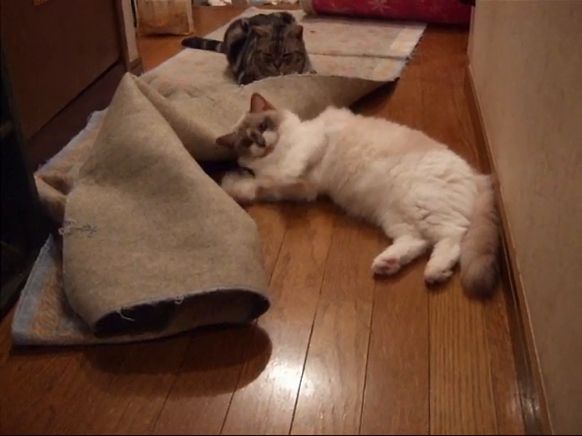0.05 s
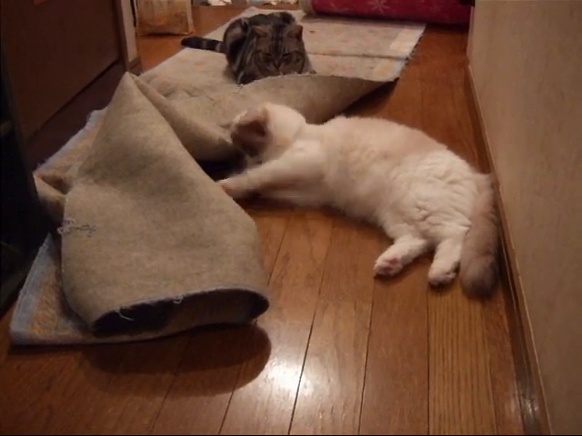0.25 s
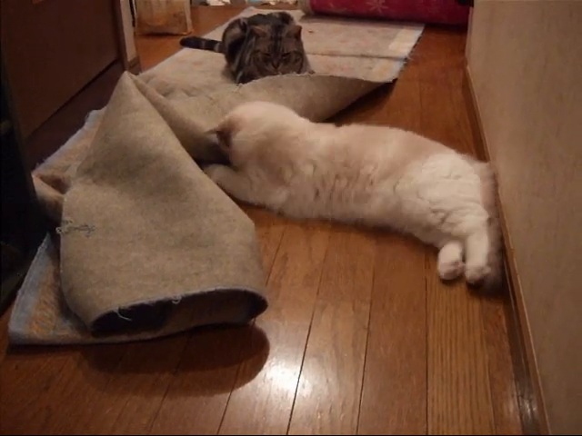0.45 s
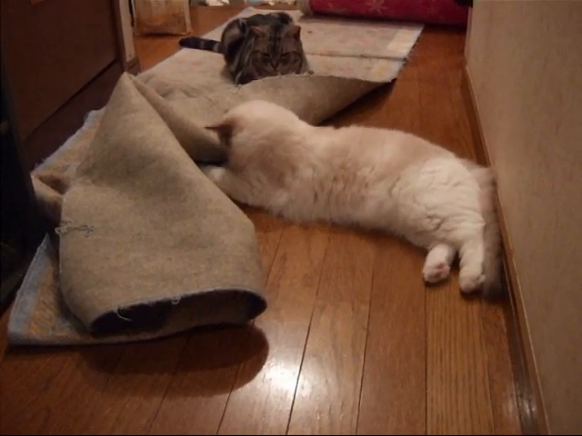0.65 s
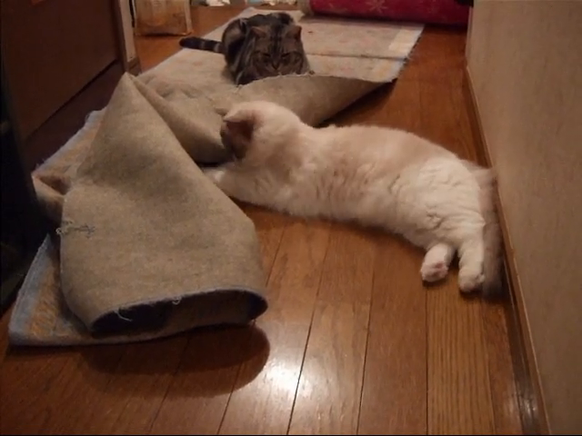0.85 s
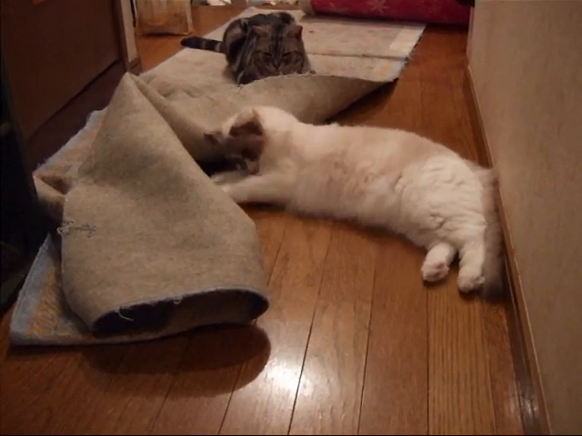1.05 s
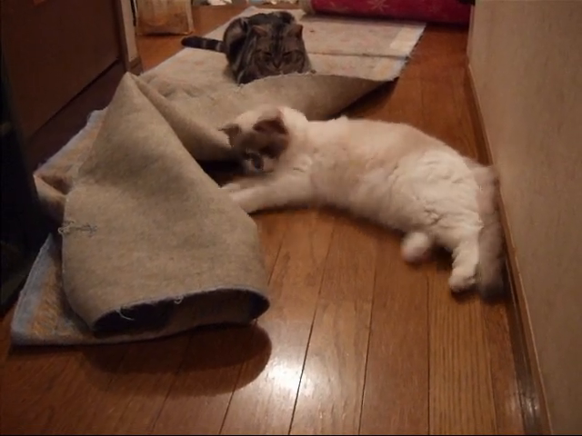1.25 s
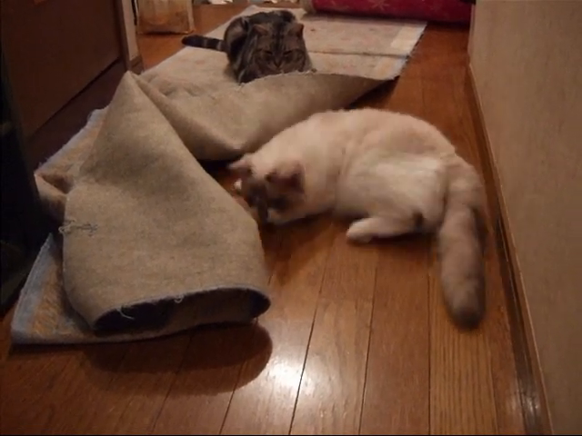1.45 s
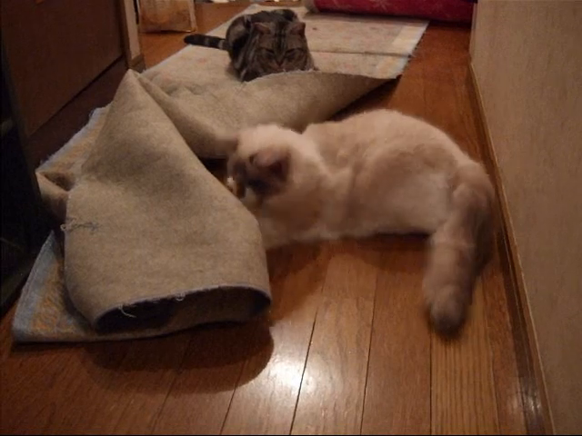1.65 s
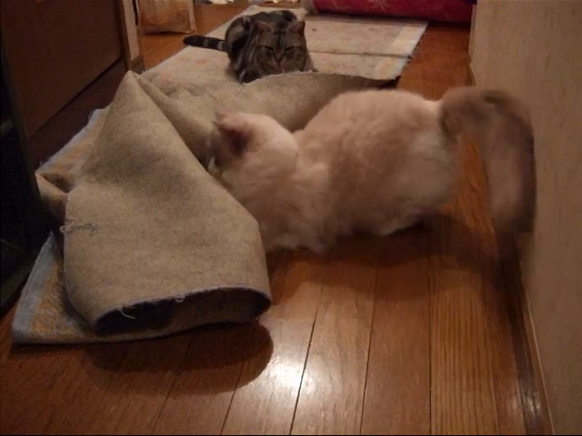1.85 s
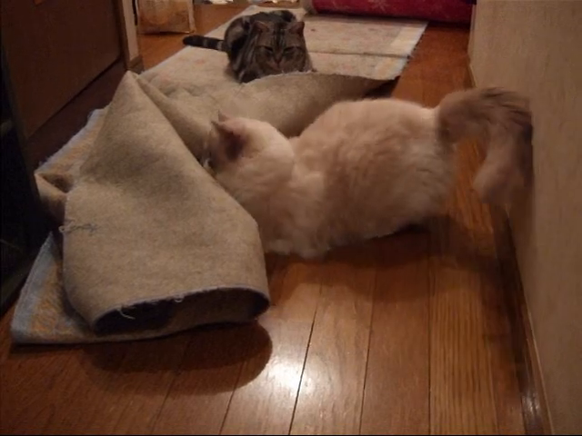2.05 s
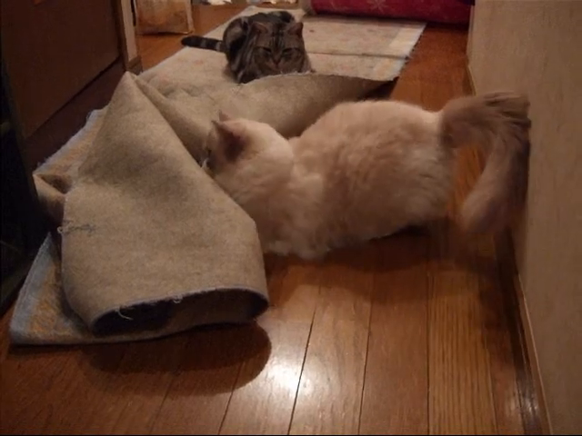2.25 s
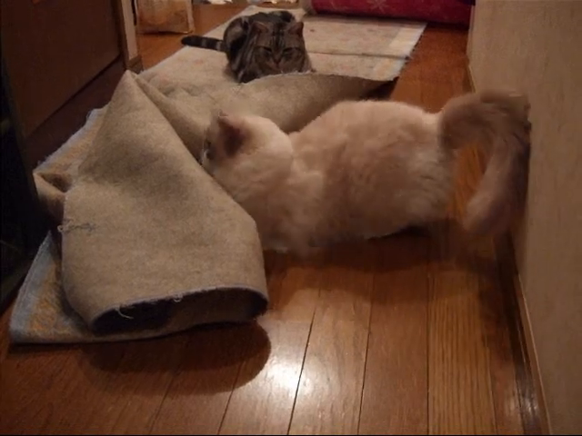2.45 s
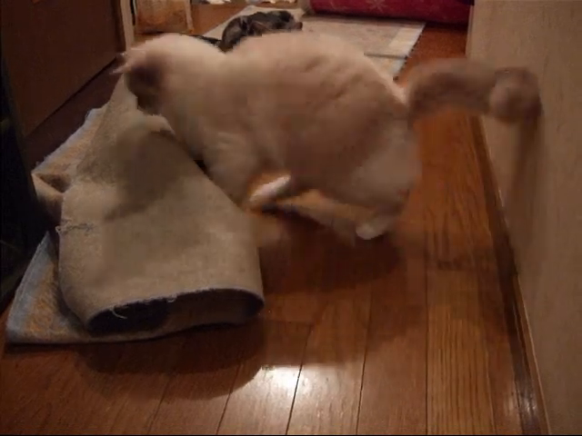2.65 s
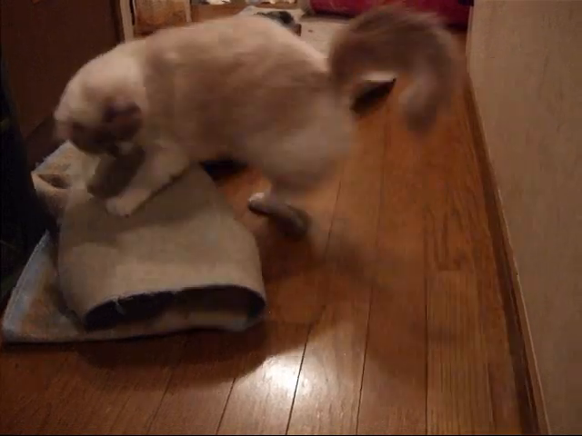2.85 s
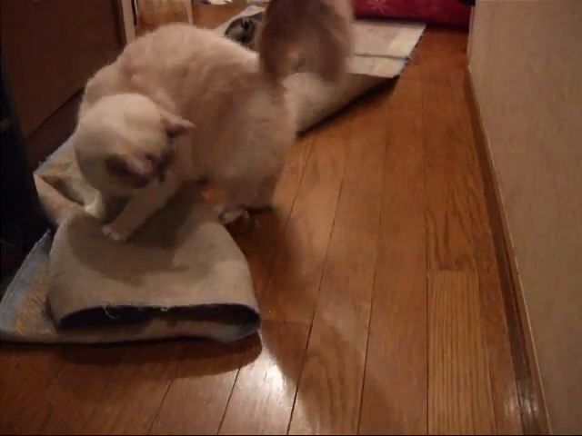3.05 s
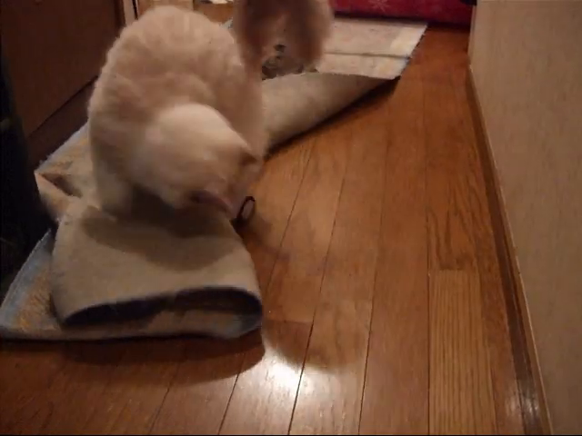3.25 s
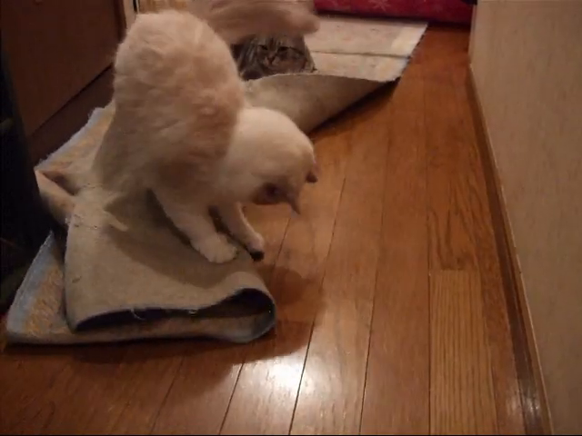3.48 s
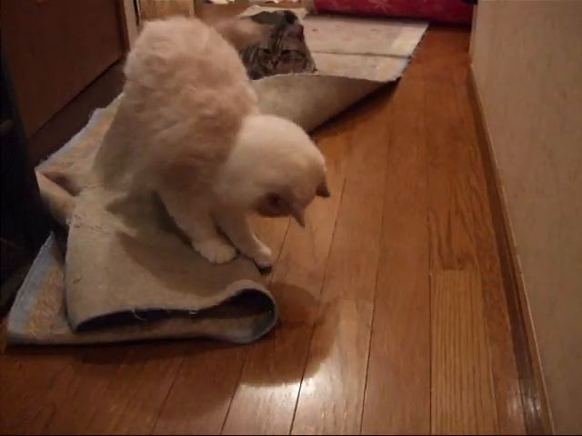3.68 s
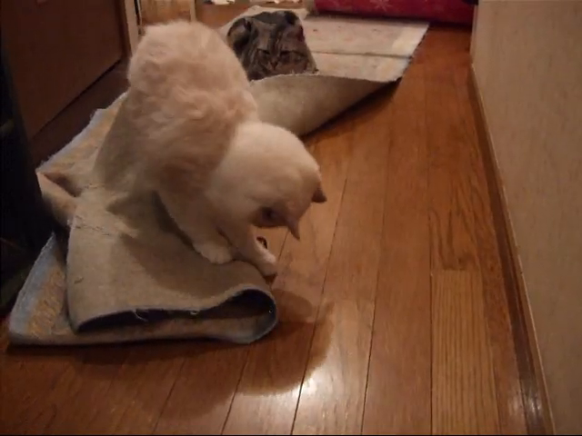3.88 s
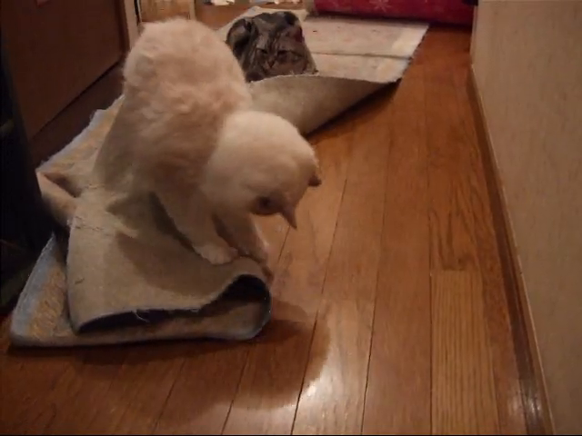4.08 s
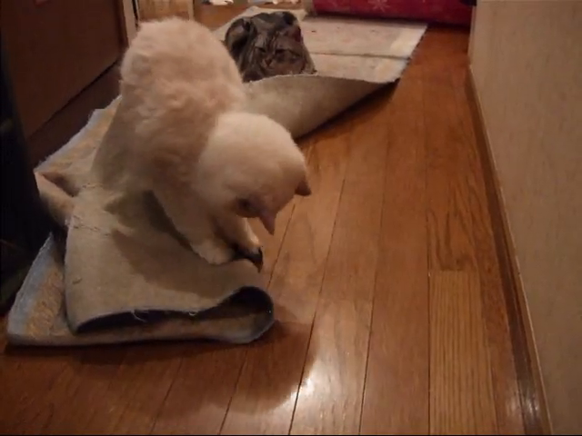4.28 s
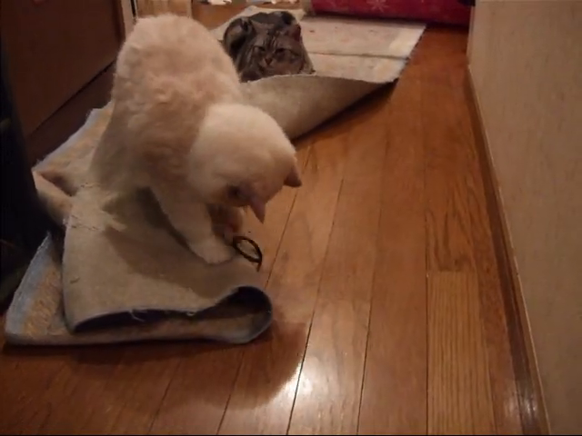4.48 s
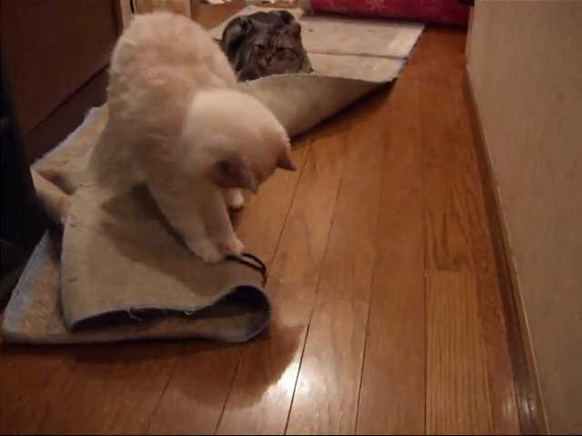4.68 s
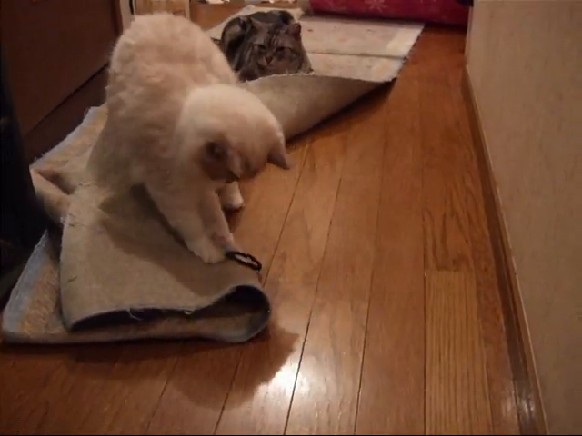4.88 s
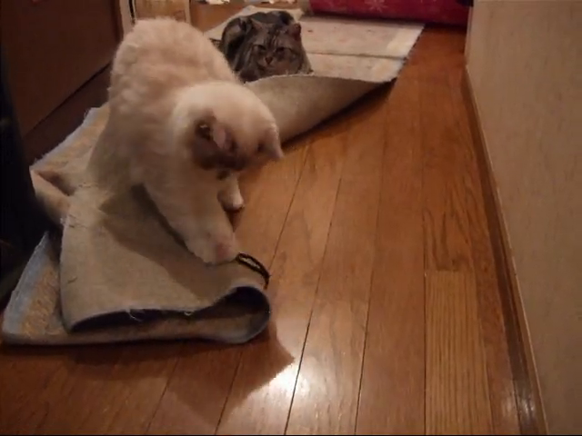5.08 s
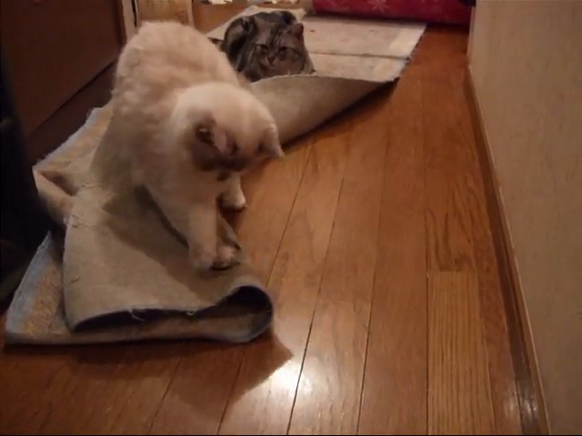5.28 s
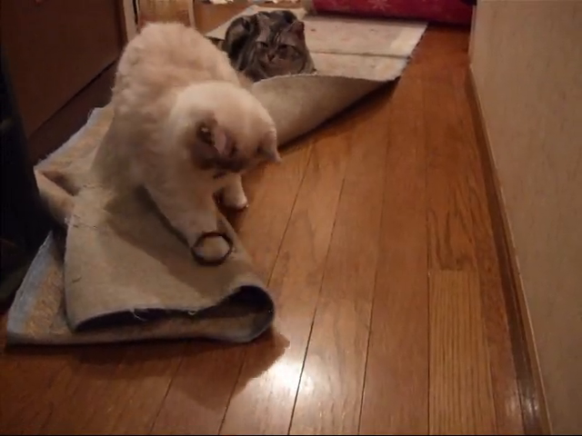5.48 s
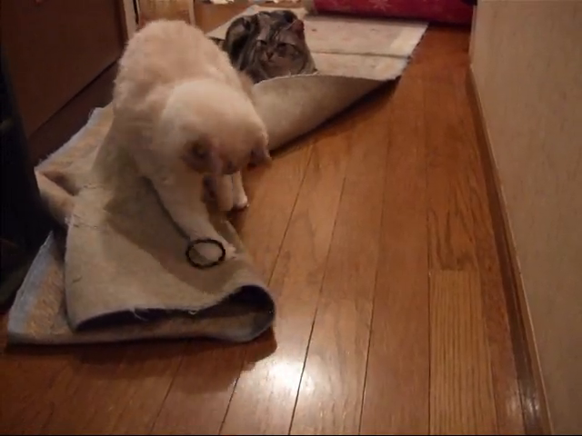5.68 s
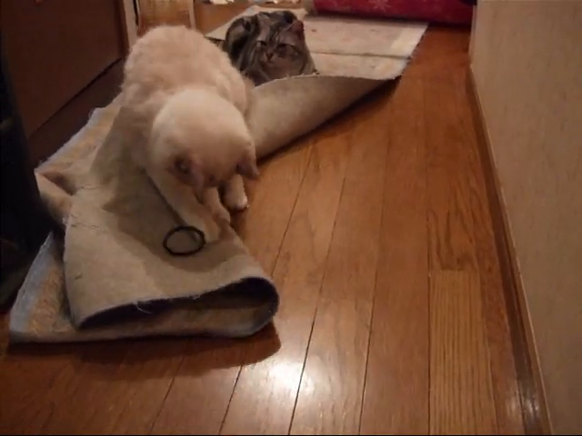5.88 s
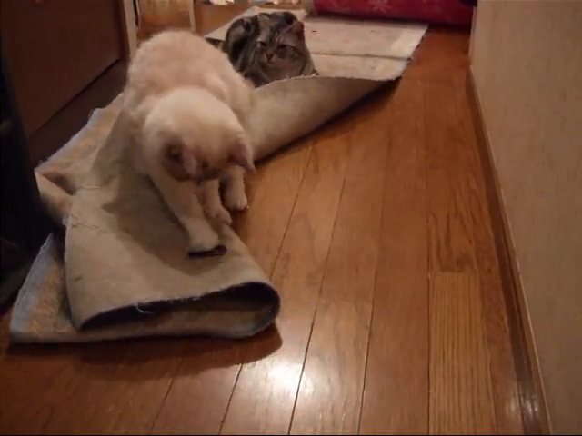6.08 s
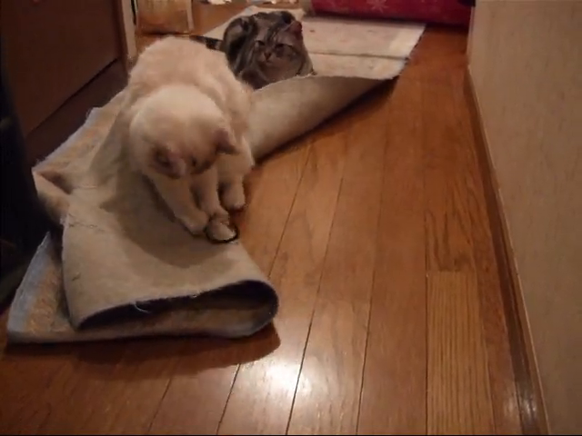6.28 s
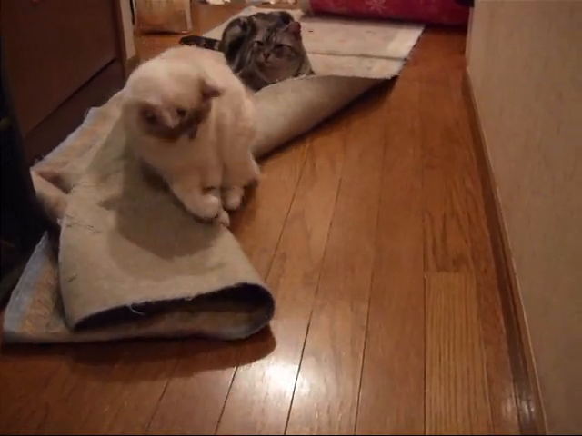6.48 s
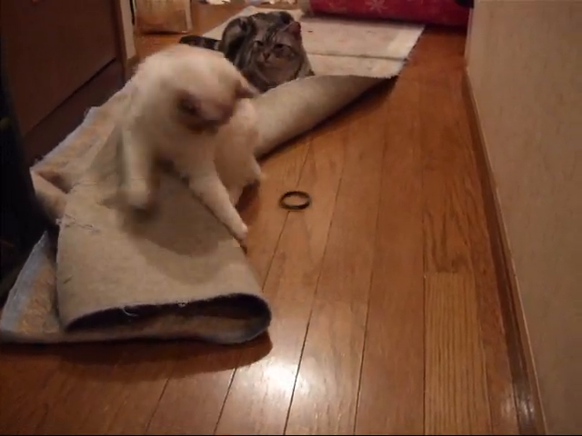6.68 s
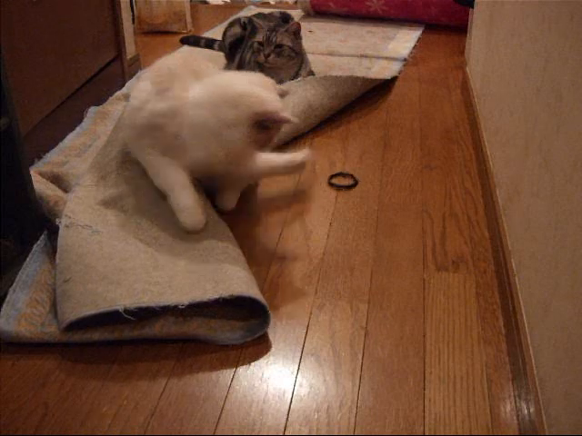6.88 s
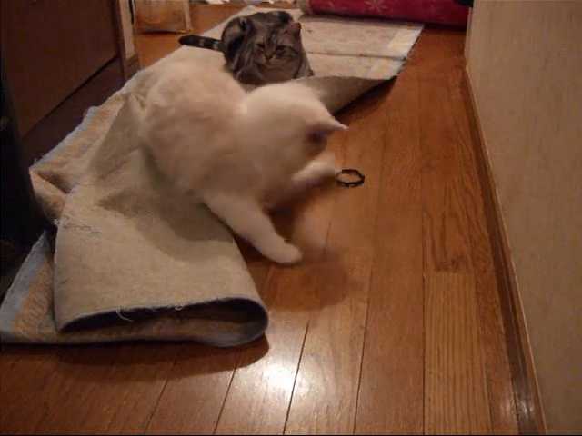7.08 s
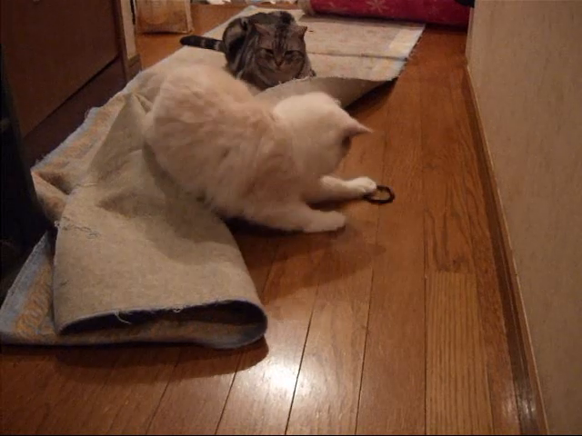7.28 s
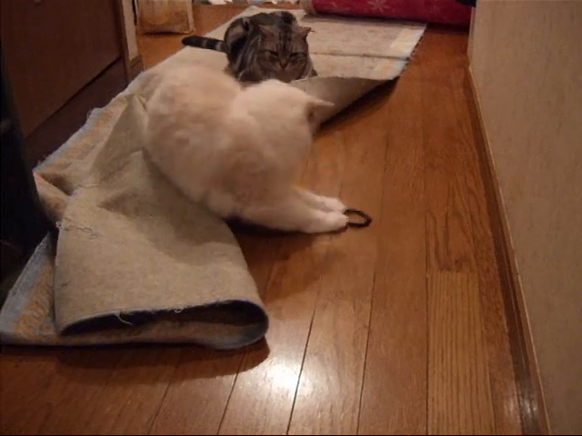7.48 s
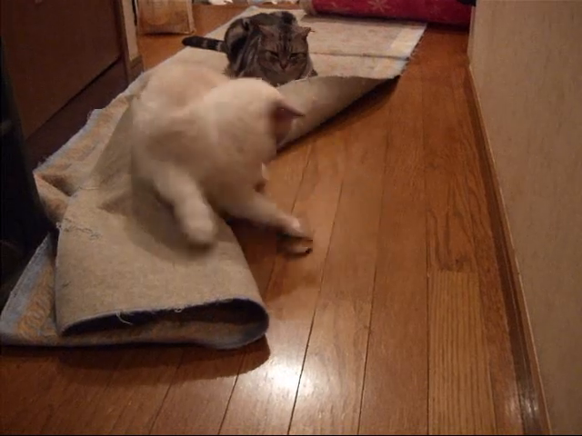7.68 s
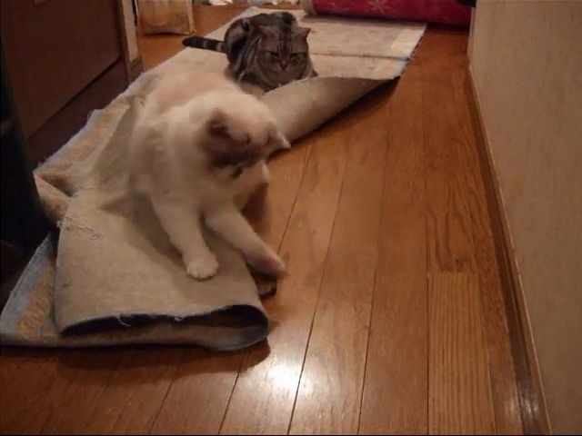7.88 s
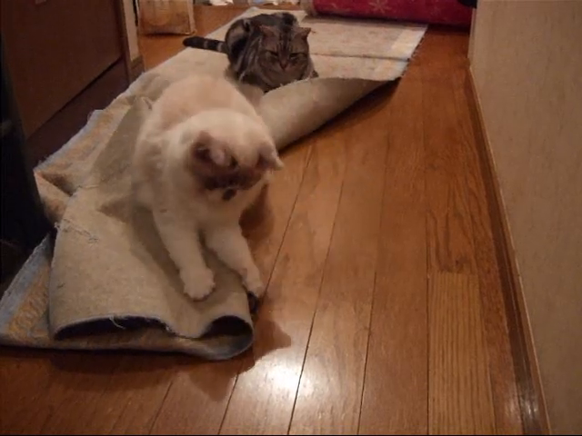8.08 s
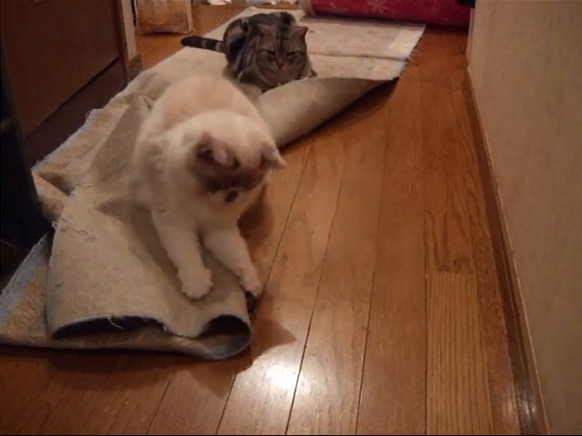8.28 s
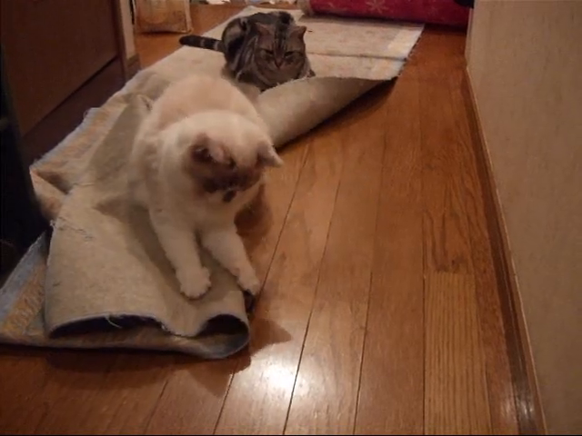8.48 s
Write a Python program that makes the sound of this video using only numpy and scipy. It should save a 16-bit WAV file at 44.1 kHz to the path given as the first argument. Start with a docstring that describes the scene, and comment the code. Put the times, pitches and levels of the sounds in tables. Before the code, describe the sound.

Indoors in a narrow wooden hallway, a steady dull hiss runs throughout with a barely felt machine throb, low hum and very faint whines. Two weak floor thumps come within the first 0.6 s, then a faint scuff at 1.2 and a soft pat at 1.4. From 1.6 to 2.0 s the kitten pushes off: low thumps, a scrape and a quick flurry of loud, dry claw clicks on varnish. Around 2.8 to 3.1 soft paws land with muffled thuds and short scuffs; at 3.45 a tight cluster of sharp clicks skids away. From 4.1 to 6.6 only sparse, quiet felt pats, tiny claw ticks and light rubs. Between 6.7 and 7.6 paws pat, scratch and slide on the boards, with brighter clicks near 7.3. Soft pats and one crisp click end the play near 8.0, leaving hiss. Centred mono, short room tail, softened top.

```python
"""In a wooden hallway, a kitten plays with a hair band on a folded felt rug.
Claws tick and skid on the boards: snapped noise bursts with a short ring, and sparse catches over a rub.
Paws pat the felt as soft shaped noise with one ringing tone; body weight thumps the floor in two low modes.
A short, dense hallway tail surrounds the play, over steady hiss, a deep machine throb, hum and faint whines."""
import sys
import numpy as np
from scipy import signal
from scipy.fft import rfft, irfft
from scipy.io import wavfile

SR = 44100
rng = np.random.default_rng(int(sys.argv[2]) if len(sys.argv) > 2 else 0)


def transcribe(signal):
    """Save signal, clipped to [-1, 1], as a 16-bit WAV file at the path in sys.argv[1]."""
    frames = np.atleast_2d(signal).T
    limited = np.clip(frames, -1, 1)
    pcm = np.round(limited * 32767).astype(np.int16)
    wavfile.write(sys.argv[1], SR, pcm)


N = 376504  # length in samples

# Claws striking the boards: start_s, level_db (relative), low_hz (lowest), focus_hz (strongest)
CLAW_STRIKES = [(1.7175, -31, 3500, 5000), (1.7425, -13.5, 1500, 4860), (1.7447, -8.5, 1800, 2500),
                (1.7668, -21, 2190, 5500), (1.7876, -6, 1600, 5900), (1.8052, -8.5, 1820, 2550),
                (1.8585, -21, 5000, 6460), (1.882, -3.5, 3460, 5950), (2.016, -26.5, 3760, 5000),
                (3.0558, -25, 1400, 2600), (3.444, -10, 2500, 5140), (3.4511, -8.5, 1900, 2980),
                (3.4553, -13, 1500, 2100), (3.4928, -16, 4170, 5470), (6.7603, -28.5, 2960, 6060),
                (7.097, -20, 2180, 5200), (7.1044, -19, 2490, 5650), (7.1434, -18.5, 1422, 2470),
                (7.2757, -11.5, 3360, 4500), (7.2939, -20, 1410, 2260), (7.3239, -14, 3240, 4500),
                (7.4437, -26.5, 4200, 5810), (7.5712, -30, 3500, 5460), (8.0185, -11.5, 2450, 5280)]
# Paws landing on felt and boards: start_s, level_db, rise_s, top_hz, ring_hz,
# ring_db (above the pat level), bared (how far the claws are out, 0-1)
PAW_PATS = [(1.423, -41, .002, 830, 425, 0, 0), (1.661, -32.5, 0.0023, 486, 319, 6, 0),
            (1.785, -40, 0.0058, 1200, 820, -1, 0), (2.925, -31, 0.0052, 700, 384, 0, 0),
            (2.929, -35.5, .003, 1580, 1276, 4.5, 0.6), (2.975, -36.5, 0.0074, 850, 326, -4, 0),
            (3.048, -38.5, 0.015, 1390, 322, 2, 0), (3.354, -39.5, 0.011, 1307, 378, -3, 0),
            (3.444, -31.5, 0.0096, 1880, 786, -8, 0), (4.117, -42, .006, 1710, 380, -14, 1),
            (4.250, -34, 0.0021, 2000, 380, -5, 0.9), (4.362, -41.5, 0.01, 1200, 382, -8, 0),
            (4.522, -37.5, .003, 1510, 396, 3, 1), (4.731, -42.5, 0.013, 940, 376, 0, 0.03),
            (4.754, -38, 0.0011, 900, 610, 2.5, 0.03), (5.329, -43, 0.0045, 1150, 402, 8.5, 0.7),
            (6.032, -31, .0015, 1260, 398, -5, 0.7), (6.168, -41.5, 0.01, 1290, 387, 2.5, 0),
            (6.577, -46, 0.0096, 653, 236, -1, 0.01), (6.710, -41, 0.0053, 940, 215, 1, .9),
            (6.801, -42, 0.0042, 720, 247, 5.5, 0.02), (6.946, -33, 0.0031, 1327, 1086, -12, 0.8),
            (7.032, -34.5, 0.0021, 1490, 370, -4, 1), (7.142, -39, 0.0017, 1810, 169, -1, 0.03),
            (7.293, -37, 0.0062, 2320, 1166, -8, 0.07), (7.895, -41.5, 0.013, 1100, 250, -4, 0.07),
            (8.019, -42.5, 0.0015, 1530, 217, -15, 0.05), (8.057, -36.5, 0.0012, 1410, 1032, -2, .4)]
# Body weight landing on the floor: start_s, level_db
BODY_THUMPS = [(.205, -40), (.521, -46), (1.66, -31.5), (1.855, -31), (2.803, -38), (2.921, -36.5),
               (3.06, -42), (3.448, -38.5), (7.143, -40.5)]
# Paws sliding: start_s, length_s, level_db (of the rub before its swell), low_hz (lowest)
PAW_SCUFFS = [(1.195, 0.077, -53.5, 3500), (1.639, 0.16, -46, 4040), (1.715, 0.1, -35.5, 2200),
              (1.883, .031, -54, 6000), (1.972, 0.016, -39.5, 3500), (2.608, 0.15, -48.5, 2320),
              (2.927, 0.036, -35.5, 2000), (2.973, 0.028, -44, 2960), (3.05, 0.063, -42.5, 1400),
              (3.34, 0.12, -50.5, 1780), (3.452, 0.071, -31.5, 1400), (3.527, 0.14, -46.5, 1920),
              (5.322, 0.16, -51.5, 3020), (6.166, 0.13, -48, 1400), (6.709, 0.038, -41, 1800),
              (6.759, 0.046, -48, 3300), (7.099, 0.11, -44, 1800), (7.272, 0.085, -33, 1700),
              (7.323, 0.067, -33, 2720), (7.392, 0.22, -50, 3520), (7.552, .11, -44.5, 3130),
              (7.896, 0.087, -49, 2460)]
# Hollow of the folded rug and the boards under it: pitch_hz, width_hz, level_db (relative)
RUG_HOLLOW = [(220, 31, 1), (316, 7.8, 0.5), (384, 11, 10), (570, 21, -22.5), (940, 100, -14),
              (1010, 190, -9.5)]
# Colour of the steady hiss: pitch_hz, level_db (per Hz, relative)
HISS_COLOUR = [(15, -2), (27, 6.5), (42, 10), (58, -5.5), (80, -0.5), (120, -4), (200, -5.5), (330, -5),
               (550, -6.5), (2000, -9), (4100, -11.5), (4800, -11), (5900, -11), (7200, -11), (7900, -11.5)]
# Deep throb of a machine, two beating tones: pitch_hz, level_db (rms)
MACHINE_THROB = [(22.45, -58.5), (30.9, -56.5)]
# Steady hum and thin whines: pitch_hz, level_db (rms)
HUM_AND_WHINES = [(51.2, -67), (100, -71), (323, -70), (1243, -90), (1652, -87), (2885, -68), (7860, -84),
                  (7887, -80)]

# Claws that are out tick just after the pad lands; the level is relative to the pat
TICK_DELAY_S, TICK_DB, TICK_LOW_HZ, TICK_FOCUS_HZ = 0.0025, 12, 1490, 4120
# A sliding paw snags a claw once in each slot; the level is relative to the rub and fades over the stroke
SNAG_SLOT_S, SNAG_DB, SNAG_SPREAD_DB, SNAG_FOCUS_HZ = 0.03, 12.5, 2, 5600
SNAG_FADE_DB = 4.5
# A slower pat lasts longer (extra seconds per second of rise); a duller one reaches lower (share of top_hz)
PAT_T60_S, T60_PER_RISE, LOW_SHARE = 0.077, 9.8, 0.2
FLOOR_HZ = 84
HALL_T60_S, SHARP_WET_DB, SOFT_WET_DB = 0.28, -8, -5.5
HISS_DB = -45.5  # rms before the low cut
CUTOFF_HZ = 7920


def claws(lead_s=0.00071, lead_share=0.2, ring_t60_s=0.025, ring_share=0.11, focus_db=3, width_hz=1300,
          top_hz=8500, board_db=-22, gain_db=11):
    """A claw drags for an instant, snaps onto the varnish and rings densely; the board adds a little knock."""
    out = np.zeros(N)
    lead = int(0.004 * SR)
    t = seconds(0.04) - lead / SR  # zero is the snap
    drag = lead_share * np.exp(-np.abs(t) / lead_s)
    ring = ring_share * dying(np.abs(t), ring_t60_s)
    shape = np.where(t < 0, drag, ring)
    for start_s, level_db, low_hz, focus_hz in claw_contacts():
        contact = shape * rng.standard_normal(len(t))
        contact[lead] = 1  # the snap itself
        snap = cut(contact, low_hz, "high", order=3)
        snap = cut(snap, top_hz, "low", order=6)
        snap = snap + from_db(focus_db) * resonate(snap, focus_hz, width_hz)
        knock = from_db(board_db) * cut(contact, 1500, "low")
        strike = snap + knock
        # Equal energy first, so the listed levels compare
        strike = strike / np.linalg.norm(strike)
        add(out, start_s + t[0], from_db(level_db + gain_db) * strike)
    return out


def claw_contacts():
    """Every claw touch, in strike columns: strikes, ticks of landing paws and snags of sliding ones."""
    ticks = []
    for start_s, level_db, *_, bared in PAW_PATS:
        if bared > 0:
            tick_db = level_db + TICK_DB + 20 * np.log10(bared)
            ticks.append((start_s + TICK_DELAY_S, tick_db, TICK_LOW_HZ, TICK_FOCUS_HZ))
    snags = []
    for start_s, length_s, level_db, low_hz in PAW_SCUFFS:
        delays_s = SNAG_SLOT_S * (np.arange(8) + rng.random(size=8))
        sizes_db = SNAG_DB + SNAG_SPREAD_DB * rng.standard_normal(size=8)
        for delay_s, size_db in zip(delays_s, sizes_db):
            if delay_s < length_s:
                snag_db = level_db + size_db - SNAG_FADE_DB * delay_s / length_s
                snags.append((start_s + delay_s, snag_db, low_hz, SNAG_FOCUS_HZ))
    return CLAW_STRIKES + ticks + snags


def scuffs(catches_per_s=1200, fur_share=0.082, top_hz=7200, rasp_hz=4900, rasp_width_hz=900, rasp_db=-1,
           skew=0.37):
    """A sliding paw: tiny catches of the claws over the smooth rub of fur, swelling and fading."""
    out, t = np.zeros(N), seconds(0.25)
    for start_s, length_s, level_db, low_hz in PAW_SCUFFS:
        caught = rng.random(len(t)) < catches_per_s / SR
        catches = caught * rng.standard_normal(len(t))
        fur = fur_share * rng.standard_normal(len(t))
        rub = cut(catches + fur, low_hz, "high", order=3)
        rub = cut(rub, top_hz, "low", order=3)
        rub = rub + from_db(rasp_db) * resonate(rub, rasp_hz, rasp_width_hz)
        # A skew below 1 brings the swell forward
        stroke = np.sin(np.pi * np.minimum(t / length_s, 1) ** skew)
        add(out, start_s, from_db(level_db) * rms_one(rub) * stroke)
    return out


def pats(felt_db=-4, ring_t60_s=0.12):
    """A soft pad presses many fibres at once; the hollow colours them and one resonance rings on."""
    out, t = np.zeros(N), seconds(0.3)
    for start_s, level_db, rise_s, top_hz, ring_hz, ring_db, _ in PAW_PATS:
        t60_s = PAT_T60_S + T60_PER_RISE * rise_s
        fibres = rng.standard_normal(len(t))
        hollow = sum(from_db(db) * resonate(fibres, hz, width_hz) for hz, width_hz, db in RUG_HOLLOW)
        body = from_db(felt_db) * fibres + hollow
        body = cut(body, LOW_SHARE * top_hz, "high")
        body = cut(body, top_hz, "low", order=3)
        onset = np.minimum(t / rise_s, 1)
        press = onset * dying(np.maximum(t - rise_s, 0), t60_s)
        # Level the noise, then give it back the loudness of its envelope
        pat = rms_one(body * press) * np.sqrt(np.mean(press ** 2))
        ring = np.sin(2 * np.pi * ring_hz * t) * onset * dying(t, ring_t60_s)
        add(out, start_s, from_db(level_db) * pat + from_db(level_db + ring_db) * ring)
    return out


def thumps(t60_s=0.19, rise_s=0.0056, upper_ratio=1.4, upper_db=-10):
    """The floor gives under the kitten and swings in two low modes."""
    out, t = np.zeros(N), seconds(0.4)
    lower = np.sin(2 * np.pi * FLOOR_HZ * t)
    upper = from_db(upper_db) * np.sin(2 * np.pi * FLOOR_HZ * upper_ratio * t)
    envelope = np.minimum(t / rise_s, 1) * dying(t, t60_s)
    for start_s, level_db in BODY_THUMPS:
        add(out, start_s, from_db(level_db) * (lower + upper) * envelope)
    return out


def hallway(x, build_s=0.0059, wall_hz=9000):
    """Close walls return a dense, short tail, modelled as decaying noise."""
    t = seconds(0.6)
    tail = cut(rng.standard_normal(len(t)), wall_hz, "low")
    tail = tail * dying(t, HALL_T60_S) * np.minimum(t / build_s, 1)
    # Unit energy, scaled for the band the walls return
    tail = tail / np.linalg.norm(tail) * np.sqrt(2 * wall_hz / SR)
    return signal.fftconvolve(x, tail)[:N]


def background():
    """Noise shaped into a smooth hiss, with steady sines for the deep throb, low hum and faint whines."""
    hz, level_db = np.transpose(HISS_COLOUR)
    bins_hz = np.fft.rfftfreq(N, 1 / SR)
    colour = from_db(np.interp(np.log(bins_hz + 1), np.log(hz), level_db))
    hiss = rms_one(irfft(rfft(rng.standard_normal(N)) * colour, N))
    hiss = cut(hiss, 24, "high", order=4)
    t = np.arange(N) / SR
    tones = np.zeros(N)
    for pitch_hz, tone_db in MACHINE_THROB + HUM_AND_WHINES:
        phase = rng.random()  # in turns
        # The root of two turns rms into peak
        tones += from_db(tone_db) * np.sqrt(2) * np.sin(2 * np.pi * (pitch_hz * t + phase))
    return from_db(HISS_DB) * hiss + tones


def from_db(db):
    """Decibels to gain."""
    return 10 ** (np.asarray(db) / 20)


def rms_one(x):
    """Scale to unit rms."""
    return x / np.sqrt(np.mean(x ** 2) + 1e-20)


def seconds(length_s):
    """A time axis."""
    return np.arange(int(length_s * SR)) / SR


def dying(t, t60_s):
    """Exponential decay, falling 60 dB in t60_s."""
    return np.exp(-np.log(1000) * t / t60_s)


def cut(x, hz, kind, order=2):
    """Butterworth low- or high-pass."""
    corner_hz = min(hz, SR / 2 - 2000)
    return signal.sosfilt(signal.butter(order, corner_hz, kind, fs=SR, output="sos"), x)


def resonate(x, hz, width_hz):
    """A two-pole resonance with a gain of about 1 at its peak."""
    r = np.exp(-np.pi * width_hz / SR)
    gain = (1 - r * r) / 2
    return signal.lfilter([gain, 0, -gain], [1, -2 * r * np.cos(2 * np.pi * hz / SR), r * r], x)


def add(track, start_s, sound):
    """Mix a sound into the track at its start."""
    at = int(start_s * SR)
    track[at:at + len(sound)] += sound[:N - at]


def scene():
    """Sharp and soft contacts share the hallway; both channels carry the same microphone."""
    sharp = claws() + scuffs()
    soft = pats() + thumps()
    room = hallway(from_db(SHARP_WET_DB) * sharp + from_db(SOFT_WET_DB) * soft)
    mono = sharp + soft + room + background()
    return np.stack([mono, mono])


def record(dry):
    """A steep elliptic low-pass cuts off the top."""
    return signal.sosfilt(signal.ellip(9, 0.5, 60, CUTOFF_HZ, fs=SR, output="sos"), dry)


dry = scene()
out = record(dry)
transcribe(out)
```